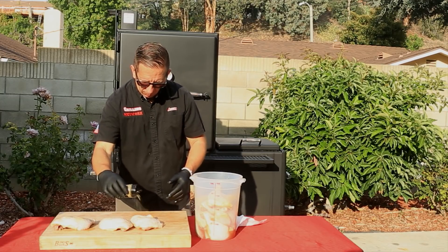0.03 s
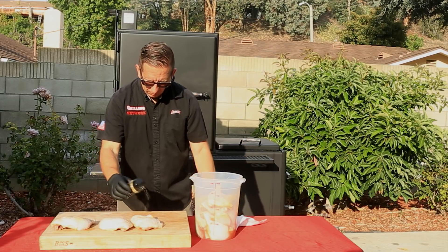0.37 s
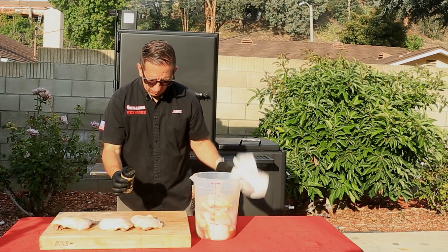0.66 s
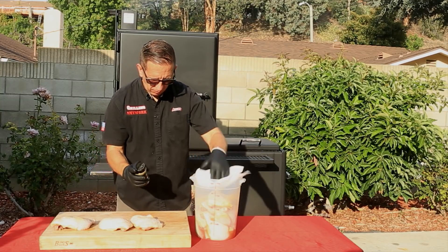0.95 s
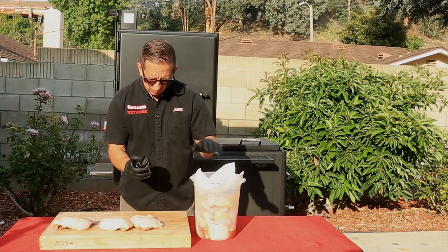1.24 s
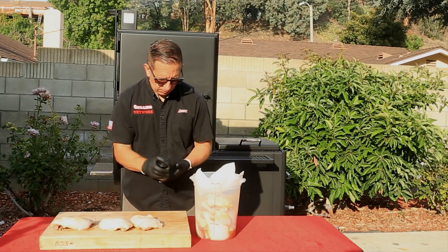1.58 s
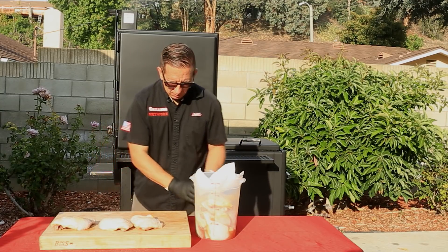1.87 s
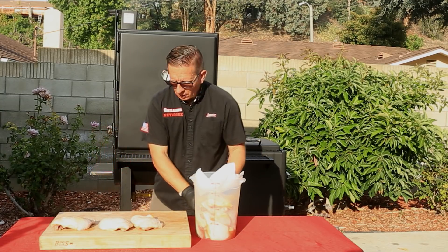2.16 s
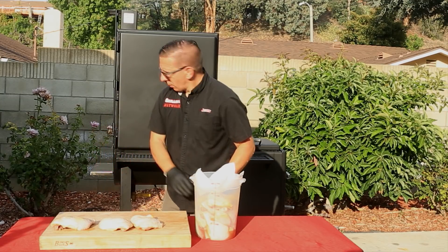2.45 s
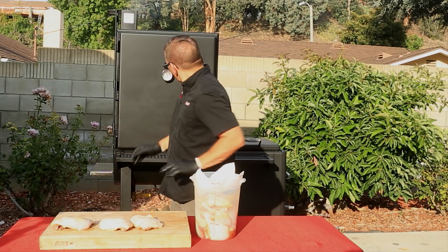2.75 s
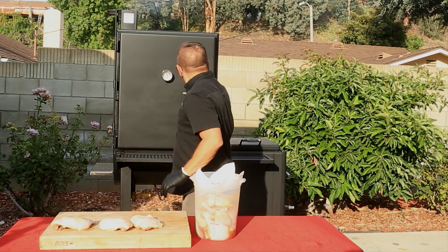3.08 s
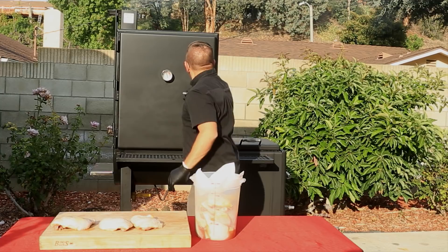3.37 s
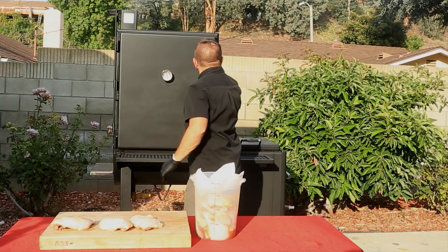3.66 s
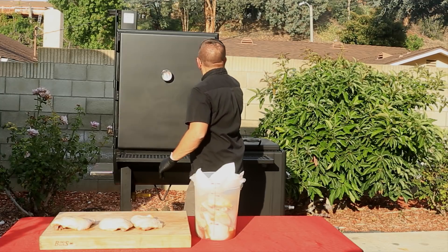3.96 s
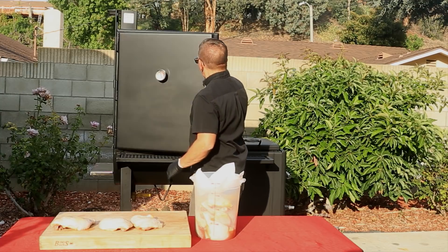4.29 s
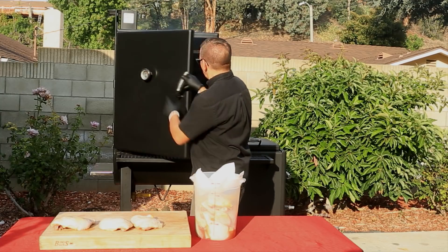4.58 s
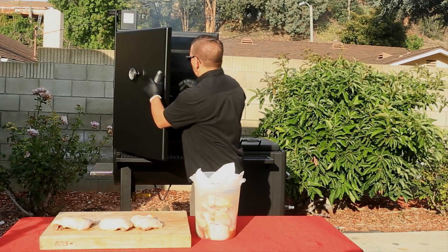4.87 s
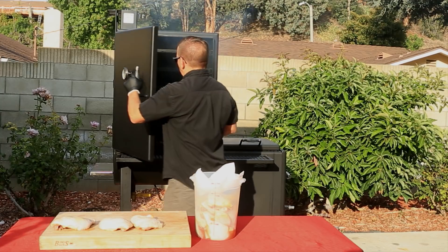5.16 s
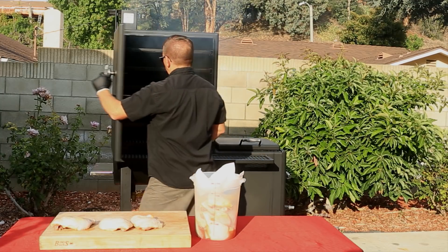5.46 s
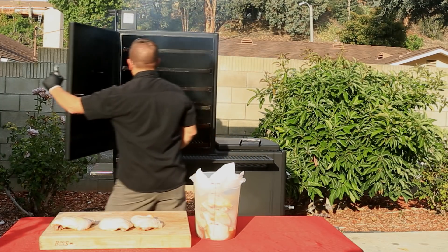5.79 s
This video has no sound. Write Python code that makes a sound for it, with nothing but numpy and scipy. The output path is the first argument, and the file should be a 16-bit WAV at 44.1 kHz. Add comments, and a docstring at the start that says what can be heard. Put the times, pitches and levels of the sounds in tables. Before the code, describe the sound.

Faint rustles and microphone thumps outdoors, then a latch snaps and a steel door swings open on loudly squealing, grinding hinges.

```python
"""A quiet back yard. A cook shakes seasoning and handles things at a table; his clip-on microphone
takes bumps and a click. He works the latch of a steel smoker (it rattles, the cabinet booms, the latch
snaps) and swings the door open. The dry hinges stick and slip at a rate that follows the swing: they
grind when slow, squeal when faster, and six times lock on a resonance and whistle."""
import sys
import numpy as np
from scipy import signal
from scipy.fft import rfft, irfft, next_fast_len
from scipy.io import wavfile

SR = 44100
rng = np.random.default_rng(int(sys.argv[2]) if len(sys.argv) > 2 else 0)


def bounce(signal):
    """Save signal as a 16-bit WAV file at the path given by the first command-line argument."""
    frames = np.transpose(np.atleast_2d(signal))
    limited = np.clip(frames, -1, 1)
    pcm = np.round(limited * 32767).astype(np.int16)
    wavfile.write(sys.argv[1], SR, pcm)


N = 265923
T = np.arange(N) / SR
TOP_HZ = 15700

# Outdoor hum. Each row: frequency in Hz, relative level in dB.
YARD_SPECTRUM = [(12, -26), (20, -1), (22, 2.5), (70, -0.5), (198, -5), (327, -14), (376, -11), (433, -14),
                 (484, -13), (973, -18), (1480, -22), (2520, -29.5), (4790, -39.5), (15900, -48.5)]
# Dull knocks on the table. Each row: start in seconds, level in dB, centre in Hz, t60 in seconds.
TABLE_KNOCKS = [(.475, -63.5, 1160, 0.55), (.969, -57, 740, 0.14), (1.6475, -53, 1600, 0.012),
                (1.683, -54, 1600, .022), (2.082, -33.5, 337, 0.18), (2.096, -46.5, 1280, 0.092),
                (3.25, -61, 1000, 0.029)]
# Faint ring after the loudest knock. Each row: centre in Hz, width in Hz, level in dB, t60 in seconds.
KNOCK_RING_BANDS = [(1440, 520, -58, 0.82), (3070, 1400, -67.5, 1)]
# Soft microphone bumps. Each row: start in seconds, peak in dB, frequency in Hz.
MIC_BUMPS = [(.49, -43.5, 146), (.844, -51.5, 36), (.959, -45, 63), (1.547, -43.5, 45), (2.477, -46, 75),
             (2.527, -46.5, 113), (2.61, -47.5, 57), (3.032, -46.5, 81), (4.616, -40.5, 106),
             (4.768, -26.5, 88), (4.975, -39.5, 85), (5.46, -43.5, 75), (5.535, -45, 65)]
# Gloves, paper, shirt. Each row: middle in seconds, half length in seconds, level in dB, centre in Hz.
RUSTLE_SWELLS = [(.895, 0.18, -82, 3340), (1.223, .032, -67.5, 2770), (1.343, .023, -69.5, 3100),
                 (1.71, .039, -67, 2290), (1.849, 0.061, -75.5, 2560), (2.055, 0.047, -71, 7300),
                 (2.557, 0.072, -65.5, 266), (3.351, 0.046, -71, 1520), (3.482, .022, -65, 3300),
                 (3.535, 0.023, -57.5, 1160), (3.667, 0.067, -57.5, 1640), (4.712, .14, -71.5, 2310)]
# Sharp click at the microphone. Each row: frequency in Hz, relative level in dB, t60 in seconds.
CLICK_MODES = [(480, -17, 0.011), (717, -13, .012), (1560, -7, 0.0099), (2120, -4, 0.013),
               (2763, -2.5, .011), (3740, -1.5, 0.0082), (4586, -1.5, 0.0083), (5480, -12.5, 0.0086),
               (8400, -17, 0.0078)]
# Small sharp ticks. Each row: start in seconds, level in dB, centre in Hz.
HANDLING_TICKS = [(1.556, -53, 3600), (1.809, -60, 4650), (3.824, -46.5, 4000), (4.161, -57, 5900)]
# Hard microphone thumps. Each row: start in seconds, peak in dB, frequency in Hz,
# then the after-swing's peak in dB, frequency in Hz and t60 in seconds.
MIC_THUMPS = [(2.081, -12, 253, -26.5, 144, 0.072), (5.054, -13, 370, -25.5, 90, 0.05)]
# Latch against door. Each row: start in seconds, level in dB, centre in Hz, t60 in seconds.
LATCH_RATTLES = [(3.411, -53, 1090, 0.18), (3.46, -49, 804, 0.13), (3.589, -49.5, 496, 0.34),
                 (3.622, -42, 1660, .17), (3.63, -44.5, 450, 0.4), (3.641, -60, 6000, .08),
                 (3.881, -58.5, 820, 0.5), (4.787, -53, 2800, 0.18), (4.794, -46.5, 640, 0.39)]
# Cabinet walls. Each row: frequency in Hz, relative level in dB, t60 in seconds.
CABINET_MODES = [(75.1, 5.5, 0.8), (107, -1, 0.61), (155.2, -14, 0.8), (194, -4, 0.42), (250.6, -4, .42),
                 (290.4, -7.5, 0.84), (345.4, -0.5, 0.7), (409, -5.5, 0.42), (563, -9, 0.25),
                 (732, -12, .25), (755, -10.5, 0.304)]
# Blows on the cabinet. Each row: start in seconds, peak in dB.
CABINET_BLOWS = [(3.582, -33), (3.63, -33.5), (3.68, -36), (3.928, -42), (4.829, -45.5), (4.975, -45)]
# Latch resonances. Each row: centre in Hz, width in Hz, level in dB, t60 in seconds.
SNAP_BANDS = [(830, 1070, -47, .53), (2320, 1400, -37, 0.26), (4200, 5100, -36.5, 0.12)]
# Strong door modes. Each row: frequency in Hz, width in Hz, relative gain in dB.
DOOR_RESONANCES = [(786, 35, 7), (944, 51, 5), (1152, 18, 6), (1225, 23, 6.5), (1358, 54, 3),
                   (1510, 6.5, 13), (1690, 9.2, 6), (1875, 16, 12.5), (2037, 13, 11.5), (2155, 14, 11),
                   (2282, 21, 10), (2780, 10, 10.5), (2836, 13, 13.5), (2990, 11, 7), (3280, 20.2, 9),
                   (3598, 51, 8.5), (3960, 45, 9.5), (4333, 47, 9), (4816, 66, 7.5), (5240, 10, 8.5)]
# The swing slows, speeds up, slows. Each row: time in seconds, slip rate in Hz, squeal drive in dB.
DOOR_SWING = [(4.846, 2740, -41), (4.86, 2581, -36), (4.922, 2090, -34), (4.945, 1880, -42.5),
              (5.0, 1480, -44), (5.07, 1289, -47.5), (5.16, 1500, -38), (5.24, 1721, -34.5),
              (5.28, 2250, -30.5), (5.335, 2400, -35), (5.375, 2738, -34), (5.46, 2859, -31.5),
              (5.58, 3250, -37), (5.69, 3045, -32), (5.735, 2931, -34.5), (5.765, 2522, -32.5),
              (5.83, 2387, -30.5), (5.98, 2123, -35.5), (6.03, 2030, -37.5)]
# Chaotic slipping. Each row: time in seconds, level in dB, relative treble in dB.
GRIND_LEVELS = [(4.84, -72, -24), (4.98, -37, -16.5), (5.24, -29.5, -17), (5.34, -39, -12),
                (5.47, -47.5, -5), (5.54, -66.5, -3), (5.73, -59, 2), (5.77, -47, 2.5), (5.9, -41.5, 3.5),
                (5.97, -50, -6.5)]
# Filter for the grind's body. Each row: frequency in Hz, gain in dB.
GRIND_FILTER = [(300, -18.5), (700, -11), (1050, -4.5), (1400, -4.5), (2200, 2), (3500, -0.5),
                (5000, -10.5), (7000, -27), (10000, -28.5), (16000, -29)]
# Slipping locked on a resonance. Each row: start, rise and length in seconds, pitch and initial offset
# in Hz, level in dB, fade in dB per second, ring-out t60 in seconds, relative levels of overtones and
# half-rate tones in dB, squeal ducking in dB.
HINGE_WHISTLES = [(5.245, 0.018, 0.029, 2029, 8, -26, 0, 0.21, -26, -45, 6),
                  (5.289, 0.083, 0.089, 2395, -64.5, -24, 0, 0.35, -13, -25.5, 4),
                  (5.35, .02, 0.077, 2585, -69, -40, 0, .08, -3.5, -11, 0),
                  (5.464, 0.065, .2, 3196, -49.5, -19, 60, 0.047, -21.5, -60, 26),
                  (5.825, .022, 0.102, 2243, 10, -28, 60, 0.097, -8, -9, 10),
                  (5.915, 0.021, 0.061, 2250, -6, -37.5, 38, .05, 3, -14, 18)]
SWING_START_S = DOOR_SWING[0][0]


def undb(db):
    """Decibels to gain."""
    return 10 ** (np.asarray(db) / 20)


def unit(x):
    """Scale to rms 1."""
    return x / np.sqrt(np.mean(x ** 2))


def add(out, start_s, sound):
    """Mix a sound in at start_s."""
    i = int(start_s * SR)
    out[i:i + len(sound)] += sound[:N - i]


def colour(x, outline):
    """Filter by a (Hz, dB) outline."""
    hz, db = np.transpose(outline)
    n = next_fast_len(len(x), real=True)
    bins_hz = np.arange(n // 2 + 1) * SR / n
    gain = undb(np.interp(np.log(bins_hz + 1), np.log(hz), db))
    return irfft(rfft(x, n) * gain, n)[:len(x)]


def resonate(x, hz, width_hz):
    """One resonance, gain 1 at its centre."""
    g, k = np.tan(np.pi * min(hz, TOP_HZ) / SR), width_hz / hz
    return signal.lfilter([g * k, 0, -g * k], [1 + g * k + g * g, 2 * g * g - 2, 1 - g * k + g * g], x)


def band(x, hz, width_hz, order=2):
    """A steep band of x at rms 1; the cascade narrows the nominal width."""
    for _ in range(order):
        x = resonate(x, hz, 0.9 * width_hz)
    return unit(x)


def wander(rate_hz, size=N):
    """Smooth random drift at rms 1."""
    steps = rng.standard_normal(size // 16)
    return unit(np.interp(T[:size] * rate_hz, np.arange(len(steps)), steps))


def burst(hz, width_hz, db, t60_s):
    """A noise band that starts at once and decays."""
    return band(rng.standard_normal(SR), hz, width_hz) * undb(db - 60 * T[:SR] / t60_s)


def strike(modes, peak_db, rise_s, scatter_db):
    """Struck modes decay; each blow favours different ones."""
    t = T[:SR]
    offsets_db = scatter_db * rng.standard_normal(len(modes))
    x = sum(undb(db + offset_db - 60 * t / t60_s) * np.sin(2 * np.pi * hz * t)
            for offset_db, (hz, db, t60_s) in zip(offsets_db, modes))
    x *= 1 - np.exp(-t / rise_s)
    return undb(peak_db) * x / np.abs(x).max()


def jolt(hz, peak_db, t60_s):
    """Soft contact: a damped swing that builds over half a cycle."""
    t = T[:SR // 2]
    x = np.sin(2 * np.pi * hz * t) * undb(-60 * t / t60_s) * np.minimum(2 * hz * t, 1)
    return undb(peak_db) * x / np.abs(x).max()


def grainy_swells(swells, grain_db=3):
    """Bell-shaped swells of grainy band noise."""
    out, t = np.zeros(N), T[:SR // 2]
    for middle_s, half_s, db, hz in swells:
        noise = rng.standard_normal(len(t))
        grains = undb(grain_db * np.repeat(rng.standard_normal(len(t)), 64)[:len(t)])
        start_s = max(middle_s - 2 * half_s, 0)
        envelope = undb(db) * np.exp(-((t + start_s - middle_s) / half_s) ** 2)
        add(out, start_s, band(noise * grains, hz, 1.79 * hz, order=3) * envelope)
    return out


def yard(level_db=-62, drift_db=0.13):
    """Distant outdoor hum, drifting slightly in level."""
    return unit(colour(rng.standard_normal(N), YARD_SPECTRUM)) * undb(level_db + drift_db * wander(12))


def shaker(start_s=0.054, period_s=0.065, half_s=0.018, level_db=-73.5, centre_hz=4450):
    """Seasoning grains hiss in five even shakes."""
    return grainy_swells([(start_s + k * period_s, half_s, level_db, centre_hz) for k in range(5)])


def knocks(ring_start_s=2.1):
    """Things knock on the table; the loudest leaves a faint ring."""
    out = np.zeros(N)
    for start_s, db, hz, t60_s in TABLE_KNOCKS:
        add(out, start_s, burst(hz, 1.28 * hz, db, t60_s))
    add(out, ring_start_s, sum(burst(*row) for row in KNOCK_RING_BANDS))
    return out


def bumps(t60_cycles=4.5):
    out = np.zeros(N)
    for start_s, db, hz in MIC_BUMPS:
        add(out, start_s, jolt(hz, db, t60_cycles / hz))
    return out


def rustles():
    """Gloves, paper and shirt rub."""
    return grainy_swells(RUSTLE_SWELLS)


def sharp_click(start_s=1.5462):
    out = np.zeros(N)
    add(out, start_s, strike(CLICK_MODES, peak_db=-24, rise_s=0.00088, scatter_db=1))
    add(out, start_s, burst(hz=4430, width_hz=11500, db=-37.5, t60_s=0.0075))
    add(out, start_s, burst(hz=3470, width_hz=4020, db=-64, t60_s=0.24))
    return out


def ticks():
    """Handled things tick sharply."""
    out = np.zeros(N)
    for start_s, db, hz in HANDLING_TICKS:
        add(out, start_s, burst(hz, width_hz=hz, db=db, t60_s=0.01))
    return out


def thumps(t60_cycles=2.1, after_delay_s=0.0029):
    """Hard hits on the microphone: a short jolt, then a lower after-swing."""
    out = np.zeros(N)
    for start_s, db, hz, after_db, after_hz, after_t60_s in MIC_THUMPS:
        add(out, start_s, jolt(hz, db, t60_cycles / hz))
        add(out, start_s + after_delay_s, jolt(after_hz, after_db, after_t60_s))
    return out


def latch(snap_s=3.929):
    """The handle rattles, the cabinet booms behind its cushioning seal, the latch snaps free."""
    out = np.zeros(N)
    for start_s, db, hz, t60_s in LATCH_RATTLES:
        add(out, start_s, burst(hz, 0.9 * hz, db, t60_s))
    for start_s, db in CABINET_BLOWS:
        add(out, start_s, strike(CABINET_MODES, db, rise_s=0.0038, scatter_db=2.5))
    add(out, snap_s, sum(burst(*row) for row in SNAP_BANDS))
    return out


def swing_curves(table):
    """Each column after the time as a control, from the start of the swing."""
    times_s, *columns = np.transpose(table)
    return [np.interp(T[int(SWING_START_S * SR):], times_s, column) for column in columns]


def door(drive, wash_t60_s, strong_db=-1, weak_count=320):
    """The steel door rings: a few strong modes over a wash of weak, scattered ones."""
    t = T[:SR // 6]
    place, size, turn = rng.random((weak_count, 3)).T[:, :, None]
    weak_hz = (np.arange(weak_count)[:, None] + place) / weak_count * TOP_HZ
    weak = np.sum(size * np.sin(2 * np.pi * (weak_hz * t + turn)), axis=0) * undb(-60 * t / wash_t60_s)
    wash = signal.fftconvolve(drive, unit(weak) / np.sqrt(len(t)))[:len(drive)]
    strong = sum(undb(db) * resonate(drive, hz, width_hz) for hz, width_hz, db in DOOR_RESONANCES)
    return (wash + undb(strong_db) * strong) / np.sqrt(2)


def flutter(phase, rough_share, rate_hz):
    """A partial with a share of its power fluttering."""
    steady = np.sin(phase)
    shaky = wander(rate_hz, len(phase)) * steady + wander(rate_hz, len(phase)) * np.cos(phase)
    return np.sqrt(1 - rough_share) * steady + np.sqrt(rough_share / 2) * shaky


def held(t, rise_s, length_s, release_s=0.011):
    """Envelope: rise, hold, release."""
    return np.clip(t / rise_s, 0, 1) * np.clip((length_s - t) / release_s + 0.5, 0, 1)


def squeal(rough_share=0.403, fall_db=8.5, direct_db=-5, door_db=-2.5):
    """Uneven slips follow the swing and shake the door; they give way while a whistle holds."""
    slip_hz, drive_db = swing_curves(DOOR_SWING)
    _, treble_db = swing_curves(GRIND_LEVELS)
    t = T[-len(slip_hz):]
    for start_s, rise_s, length_s, *_, duck_db in HINGE_WHISTLES:
        drive_db -= duck_db * held(t - start_s, rise_s, length_s)
    jitter = 0.026 * rough_share * wander(500, len(t))
    phase = 2 * np.pi * np.cumsum(slip_hz * (1 + jitter)) / SR
    tone = flutter(phase, rough_share, rate_hz=380)
    for k in range(2, 7):
        partial_db = -6 + 0.21 * treble_db - fall_db * (k - 2) ** 1.06
        tone += undb(partial_db) * flutter(k * phase, rough_share, rate_hz=240) * (k * slip_hz < SR / 2)
    tone *= np.sqrt(2) * undb(drive_db)
    return undb(direct_db) * tone + undb(door_db) * door(tone, wash_t60_s=0.25)


def grinding(slips_per_s=3500, spread_db=4, scrape_s=5.984, scrape_db=-34.5, scrape_t60_s=0.27):
    """Irregular slips rattle the door: brighter as it opens, with a last scrape as it slows."""
    level_db, treble_db = swing_curves(GRIND_LEVELS)
    t = T[-len(level_db):]
    slips = (rng.random(len(t)) < slips_per_s / SR) * undb(spread_db * rng.standard_normal(len(t)))
    ringing = door(slips - slips.mean(), wash_t60_s=0.17)
    body = unit(colour(ringing, GRIND_FILTER))
    rasp = band(ringing, hz=5780, width_hz=8400)
    flicker_db = 1.65 * wander(120.2, len(t))
    grind = (body + undb(treble_db) * rasp) * undb(level_db + flicker_db)
    decay = (t > scrape_s) * undb(-60 * np.maximum(t - scrape_s, 0) / scrape_t60_s)
    scrape = undb(scrape_db) * decay * (body + undb(-3) * decay * rasp)
    return grind + scrape


def whistles(waver=0.00044, settle_s=0.0607, buzz_rise_s=0.019, fall_db=9):
    """Locked slipping is nearly pure, and its resonance rings on."""
    out, t = np.zeros(N), T[:SR // 2]
    for row in HINGE_WHISTLES:
        start_s, rise_s, length_s, hz, offset_hz, db, fade_db_per_s, t60_s, overtone_db, half_db, _ = row
        pitch_hz = hz * (1 + waver * wander(70, len(t))) + offset_hz * np.exp(-(t / settle_s) ** 2)
        phase = 2 * np.pi * np.cumsum(pitch_hz) / SR
        buzz = np.zeros(len(t))
        for k in range(2, 7):
            partial_db = overtone_db - fall_db * (k - 2) ** 1.06 + 2 * wander(35, len(t))
            buzz += undb(partial_db) * np.sin(k * phase)
        # Alternating strong and weak slips add rough tones between the harmonics.
        for ratio, trim_db in zip((0.5, 1.5, 2.5, 3.5), (-9, 0, -5, -10)):
            buzz += undb(half_db + trim_db) * flutter(ratio * phase, rough_share=0.79, rate_hz=200)
        buzz *= held(t, buzz_rise_s, length_s)
        ring_out = undb(-60 * np.maximum(t - length_s, 0) / t60_s)
        tone = np.sin(phase) * np.minimum(t / rise_s, 1) * ring_out
        gain = np.sqrt(2) * undb(db - fade_db_per_s * np.maximum(t - rise_s, 0))
        add(out, start_s, gain * (tone + buzz))
    return out


def hinges(onset_s=0.0044):
    """Dry hinges stick and slip: squeal and grind start with the swing, whistles follow."""
    out = whistles()
    rough = squeal() + grinding()
    add(out, SWING_START_S, rough * np.minimum(T[:len(rough)] / onset_s, 1))
    return out


def scene():
    """One microphone feeds both channels."""
    mono = yard() + shaker() + knocks() + bumps() + rustles() + sharp_click() + ticks() + thumps()
    mono += latch() + hinges()
    return np.array([mono, mono])


def record(dry):
    """Steep low-pass at TOP_HZ."""
    return signal.sosfilt(signal.ellip(10, 0.2, 80, TOP_HZ, fs=SR, output="sos"), dry)


dry = scene()
out = record(dry)
bounce(out)
```